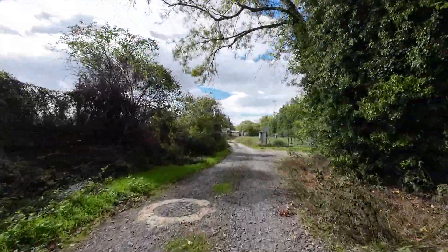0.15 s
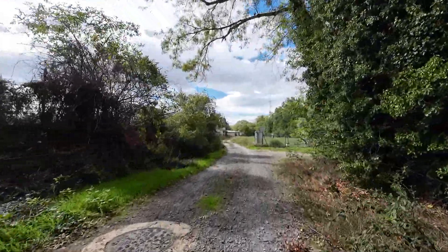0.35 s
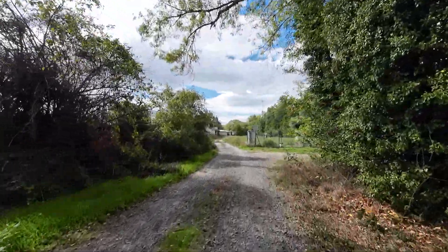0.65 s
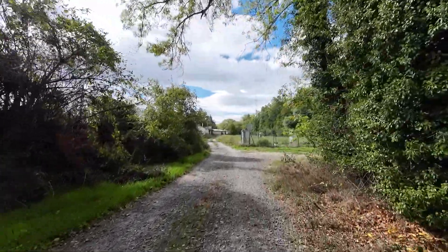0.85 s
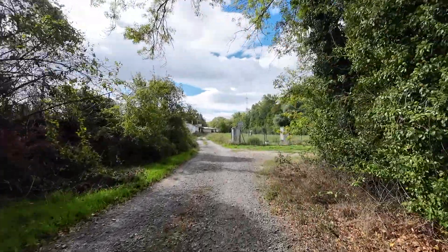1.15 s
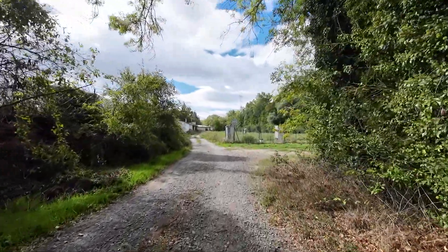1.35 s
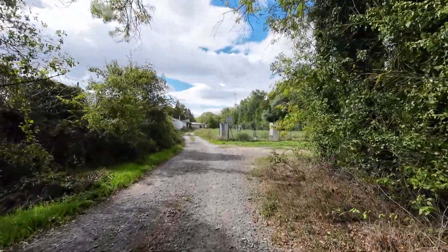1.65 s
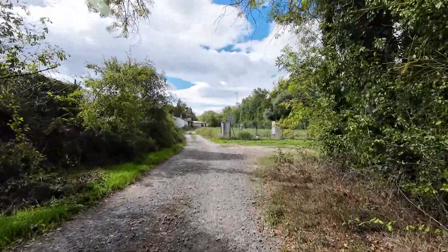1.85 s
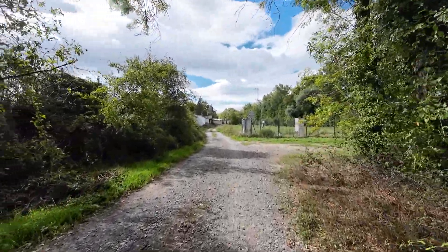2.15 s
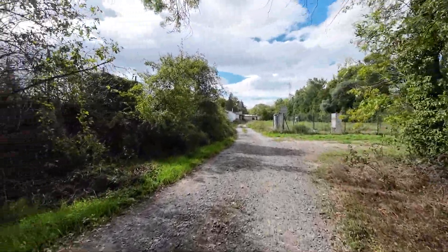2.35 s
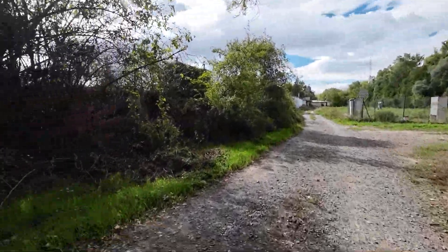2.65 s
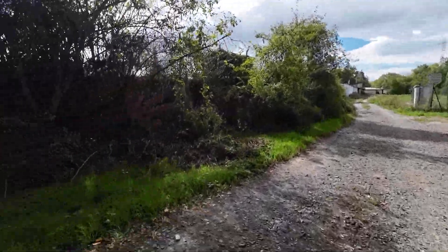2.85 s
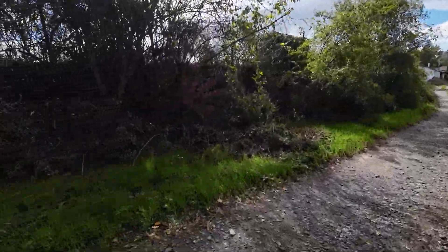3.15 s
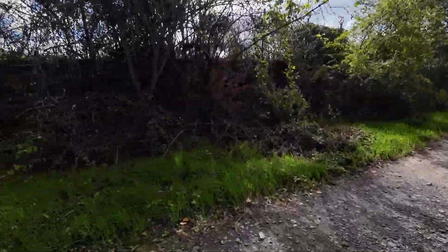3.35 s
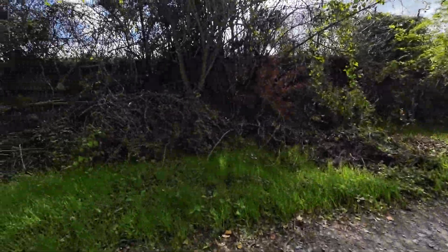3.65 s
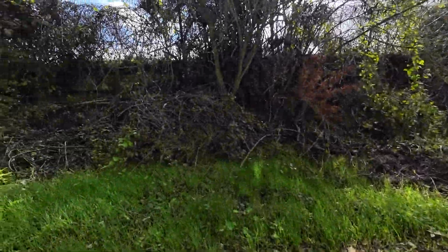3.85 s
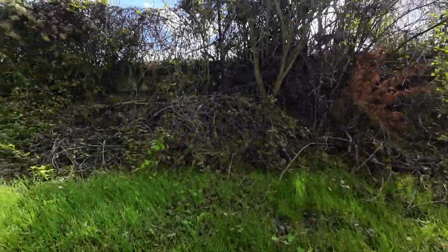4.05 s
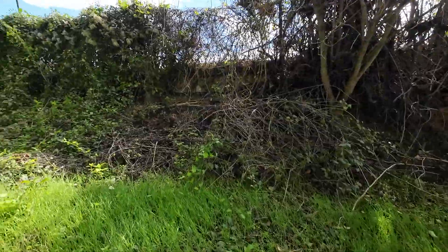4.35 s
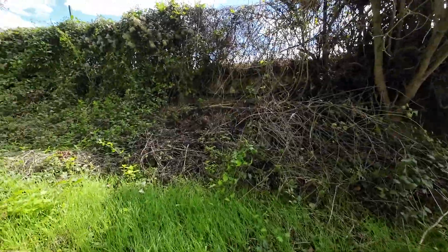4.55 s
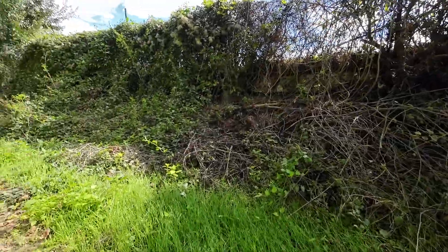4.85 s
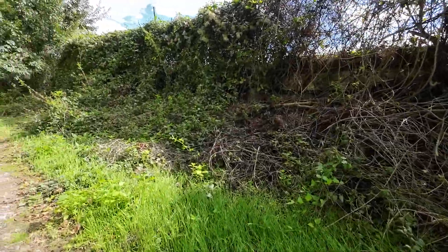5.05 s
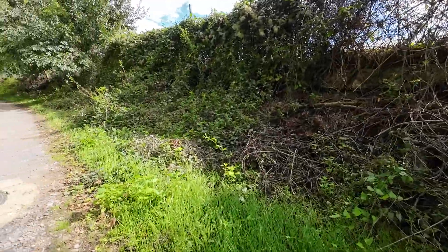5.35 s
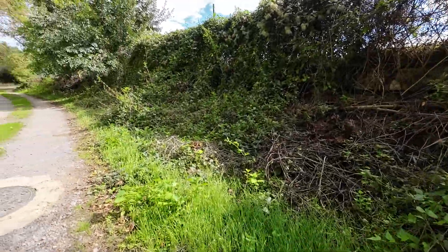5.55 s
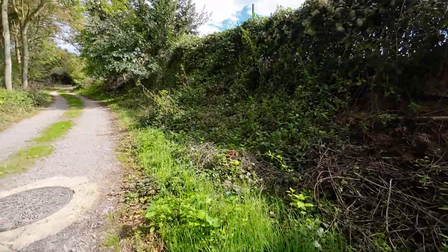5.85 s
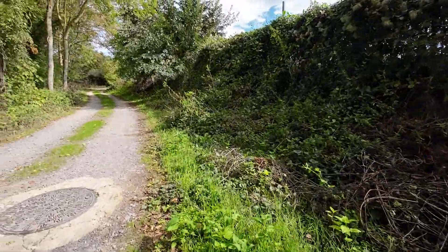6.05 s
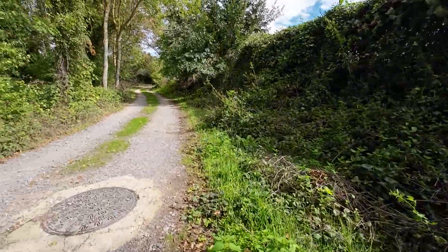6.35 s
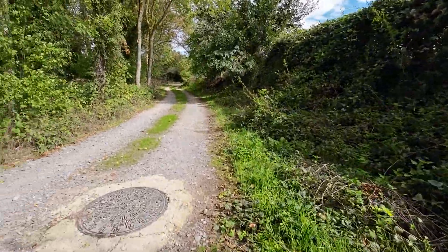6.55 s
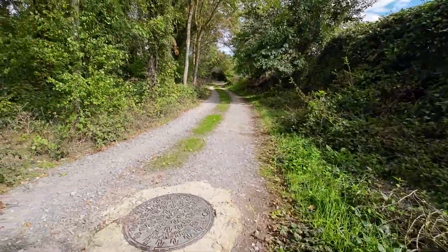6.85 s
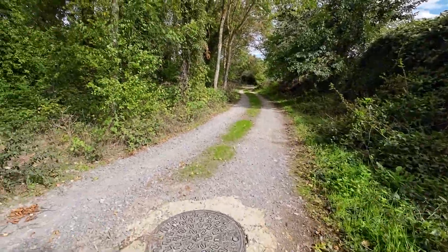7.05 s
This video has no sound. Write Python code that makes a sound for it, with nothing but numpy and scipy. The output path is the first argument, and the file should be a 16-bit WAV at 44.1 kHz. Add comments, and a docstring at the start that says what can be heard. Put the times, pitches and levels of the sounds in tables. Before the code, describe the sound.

Bicycle tyres crunch and pop over gravel under buffeting wind, then slow, stop with a thud, ratchet clicks and a few last shifting stones.

```python
"""Stones crunch and pop under the tyres of a bicycle that slows, turns and stops on a gravel track.
The gravel is many short wavelets over shaped noise; single stones have their own pops, thumps and rolls.
Shaped noise also makes the wind that rumbles in and slaps a microphone on the rider, and the rustling.
Quick bursts make the ticks, the ratchet and the thuds that ring the frame; a spoke pings and the
frame hums in sine tones, with a thin high whistle and far wind behind."""
import sys
import numpy as np
from scipy import signal
from scipy.fft import rfft, irfft, next_fast_len
from scipy.io import wavfile
from scipy.ndimage import map_coordinates

SR = 44100
rng = np.random.default_rng(int(sys.argv[2]) if len(sys.argv) > 2 else 0)


def linear_from_db(decibels):
    """Turn decibels (scalar or array-like) into linear amplitude factors; 0 gives 1."""
    return 10 ** (np.asarray(decibels, float) / 20)


def output_pcm(signal):
    """Save a mono or channel-first signal as 16-bit PCM at the path in sys.argv[1].

    Samples are clipped to [-1, 1] before scaling.
    """
    pcm = np.clip(np.atleast_2d(signal).T, -1, 1) * 32767
    wavfile.write(sys.argv[1], SR, np.round(pcm).astype(np.int16))


N = 317961  # length in samples

# Eddies in the wind that slap the microphone. Each row: time in seconds, level of the click in dB.
SLAP_TIMES = [(0.0313, -17.5), (0.07, -26), (0.0992, -25), (0.1587, -32), (0.234, -24), (0.2527, -25),
              (0.381, -26.5), (0.446, -30), (0.5141, -32), (0.532, -27), (0.5456, -18.5), (0.6125, -25.5),
              (0.667, -27), (0.7573, -25.5), (0.8708, -26), (0.95, -30), (1.149, -30), (1.1923, -39),
              (1.2266, -26), (1.3424, -24), (1.4, -34), (1.632, -35), (1.7603, -40), (1.8032, -36),
              (1.8898, -34)]
# Colour of bright rustling and of small clicks. Each row: frequency in Hz, level in dB per Hz.
RUSTLE_SPECTRUM = [(1500, -5), (2600, 0), (3800, -2), (4500, -4), (5700, 2), (6700, -5), (7600, -2),
                   (8900, -9), (10000, -4), (11500, -5), (13600, -17), (15200, -6.5), (16000, -27)]
# Colour of the hiss of gravel. Each row: frequency in Hz, level in dB per Hz.
GRAVEL_SPECTRUM = [(210, 1), (350, -3.5), (584, 1), (1020, 2.5), (1410, 2), (3730, -18), (5570, -24),
                   (9140, -36), (11300, -62), (16000, -51)]


def unit(x):
    """Scales x to an average strength (rms) of 1."""
    return x / np.sqrt(np.mean(x ** 2) + 1e-20)


def along(points, hz):
    """Reads a curve of (Hz, value) points at the frequencies hz, on a log axis as we hear pitch."""
    f, v = np.transpose(points)
    return np.interp(np.log(hz + 1), np.log(f + 1), v)


def curves(rows):
    """Joins the rows by straight lines: one value per sample for each column after the time."""
    s, *columns = np.transpose(rows)
    return [np.interp(np.arange(N) / SR, s, column) for column in columns]


def wobble(rate):
    """A smooth random curve around zero, with this many random points a second."""
    points = rng.standard_normal(int(N * rate / SR) + 4)
    return map_coordinates(points, [np.arange(N) * rate / SR])


def filtered(x, response):
    """Multiplies each frequency in x by response(hz)."""
    m = next_fast_len(N + 8192)  # spare room, so that the end does not wrap into the start
    return irfft(rfft(x, m) * response(np.fft.rfftfreq(m, 1 / SR)), m)[..., :N]


def coloured(x, spectrum):
    """Filters x by the spectrum and scales it to rms 1."""
    return unit(filtered(x, lambda hz: linear_from_db(along(spectrum, hz))))


def pops(s, db, hz, cycles):
    """Short wavelets: each swells for the given number of cycles, then dies away."""
    t = np.arange(512) / SR
    u = t * (hz / cycles)[:, None]  # 1 at the height of the swell
    swell = u ** 2 * np.exp(2 - 2 * u)
    phase = rng.uniform(0, 2 * np.pi, (len(s), 1))
    wave = linear_from_db(db)[:, None] * swell * np.sin(2 * np.pi * hz[:, None] * t + phase)
    at = np.round(s * SR).astype(int)[:, None] + np.arange(len(t))
    return np.bincount(at.ravel(), wave.ravel(), N + SR)[:N]  # adds up where pops overlap


def bursts(s, db, t60, attack=0.00032):
    """Envelope of quick bursts; t60 is the time in seconds in which each fades by 60 dB."""
    env = np.zeros(N + SR)
    t = np.arange(SR // 4) / SR
    for start, level, decay in zip(s, db, np.broadcast_to(t60, np.shape(s))):
        fade = linear_from_db(level - 60 * t / max(decay, 1e-3))
        rise = 1 - np.exp(-(t / attack) ** 2)
        env[round(start * SR):][:len(t)] += fade * rise
    return env[:N]


def swells(rows):
    """Envelope of bell-shaped swells, one for each (seconds at the height, dB, length in seconds)."""
    t = np.arange(0, N / SR, .001)  # drawn every millisecond
    bells = sum(linear_from_db(db) * np.exp(-(2 * (t - s) / length) ** 2) for s, db, length in rows)
    return np.interp(np.arange(N) / SR, t, bells)


def scatter(count, spread_db, rarest):
    """Random times and levels in dB, a few well above the rest; the share rarest bounds the biggest."""
    draw = rng.uniform(size=(count, 2))
    return draw[:, 0] * N / SR, -spread_db * np.log(draw[:, 1] + rarest)


def clicks(s, db, bright_db, t60, snap_db):
    """A sharp first contact, strongest in dull clicks, then a short decay whose treble dies sooner."""
    metal = coloured(rng.standard_normal(N), RUSTLE_SPECTRUM)
    top = filtered(metal, lambda hz: hz > 9000)
    snap = pops(s, db + snap_db - .5 * bright_db, np.full(len(s), 3600.), cycles=1.0)
    body = bursts(s, db - 3, t60) * unit(metal - top)
    treble = bursts(s, db + bright_db + 0.5, 0.73 * t60) * unit(top)
    return snap + body + treble


def air():
    """Far wind in the hedges, never silent: soft noise with a slowly drifting level."""
    # Colour of the far wind. Each row: frequency in Hz, level in dB per Hz.
    air_spectrum = [(120, -68), (200, -9), (330, -6.5), (457, -3.5), (4000, -29.5), (8800, -120)]
    return linear_from_db(-53.5 + 0.28 * wobble(2.4)) * coloured(rng.standard_normal(N), air_spectrum)


def whistle():
    """A thin, very high steady tone that comes and goes in a few faint swells."""
    # Swells of the tone. Each row: time of the height in seconds, level in dB, length in seconds.
    whistle_swells = [(3.79, -64, .17), (3.99, -69, .12), (4.19, -62, .18), (4.45, -62, .25)]
    tone = np.sin(2 * np.pi * 15740 * np.arange(N) / SR)
    return swells(whistle_swells) * linear_from_db(2.1 * wobble(40)) * tone


def hum():
    """The frame hums faintly as the wheel drags round: a wavering tone with its octave."""
    # Swells of the hum. Each row: time of the height in seconds, level in dB, length in seconds.
    hum_swells = [(3.04, -55, .2), (3.26, -58, 0.18)]
    hum_hz, octave_db = 380, -1.5
    phase = 2 * np.pi * np.cumsum(hum_hz * (1 + 0.025 * wobble(40))) / SR
    tone = np.sin(phase) + linear_from_db(octave_db) * np.sin(2 * phase)
    return swells(hum_swells) * linear_from_db(4.2 * wobble(25.04)) * tone


def pings():
    """A thrown stone strikes a spoke, and each strike rings it briefly at its own few pitches."""
    # Strikes on the spoke. Each row: time in seconds, level in dB.
    strikes = [(6.2705, -38), (6.279, -43)]
    # What the spoke rings with. Each row: frequency in Hz, level in dB, time to fade by 60 dB in seconds.
    spoke_modes = [(4320, -7, .04), (5550, -4, .025), (7450, -9, .025)]
    s, db = np.transpose(strikes)
    t = np.arange(N) / SR
    ring = 0
    for hz, mode_db, t60 in spoke_modes:
        env = bursts(s, db + mode_db, t60) * linear_from_db(2.2 * wobble(300))
        ring = ring + env * np.sin(2 * np.pi * hz * t)
    return ring


def ratchet():
    """The freewheel turns as the bicycle is pushed round: a soft click as the pawl drops over a tooth."""
    # Speed of the ratchet. Each row: time in seconds, clicks a second.
    ratchet_speed = [(4.597, 20), (4.65, 26), (4.74, 32), (4.87, 29), (4.95, 25), (5.0, 21)]
    t = np.arange(N) / SR
    turning = (t >= ratchet_speed[0][0]) * (t <= ratchet_speed[-1][0])
    teeth = np.cumsum(curves(ratchet_speed)[0] * turning) / SR  # teeth passed so far
    s = t[1:][np.diff(np.ceil(teeth)) > 0]
    env = bursts(s, rng.normal(-48.5, 1.6, len(s)), 0.032, attack=0.0024)
    return env * coloured(rng.standard_normal(N), RUSTLE_SPECTRUM)


def rustle():
    """Bright fizz of grit and cloth near the microphone, dotted with ticks of chain and frame."""
    # Steady rustling near the microphone. Each row: time in seconds, level in dB.
    cloth_level = [(0, -56.5), (1.4, -57), (2.1, -63.5), (3.35, -65.5), (4.3, -62), (5.4, -63), (5.8, -55),
                   (6.2, -55.5), (6.4, -61.5), (6.75, -52.5), (7.21, -59)]
    # Cloth or leaves brush past. Each row: time of the height in seconds, level in dB, length in seconds.
    brush_swells = [(2.905, -50, 0.022), (3.062, -49, 0.011), (3.53, -53, 0.023), (5.69, -52, 0.14),
                    (6.0, -55, 0.031), (7.17, -53.5, 0.071)]
    # Ticks of the chain and grit on the frame. Each row: time in seconds, level in dB, brightness in dB.
    tick_times = [(2.2968, -34, -27), (2.9327, -37.5, -26), (3.056, -28.5, -9), (3.077, -44, -2),
                  (3.108, -38.5, -5), (3.2214, -41.5, 3), (3.501, -30, -12), (3.522, -32.5, 1),
                  (3.601, -34, -19), (3.8067, -39, -11), (4.2751, -30, -12), (5.6544, -35.5, 3),
                  (5.684, -29.5, -6), (5.733, -33.5, -5), (5.9075, -32, -14), (5.9744, -41, 4),
                  (6.27, -30, -19), (6.366, -43, 0), (6.394, -40, 1), (6.5198, -34.5, -18),
                  (6.7372, -34, -9), (6.9381, -43, 9), (7.187, -34, -23)]
    s, size_db = scatter(count=400, spread_db=1.5, rarest=.01)
    grit = unit(bursts(s, size_db, 0.012) * linear_from_db(0.45 * wobble(6.6)))
    noise = coloured(rng.standard_normal(N), RUSTLE_SPECTRUM)
    fizz = (0.72 * linear_from_db(1.4 * wobble(21)) + 0.41 * grit) * noise
    ticks = clicks(*np.transpose(tick_times), t60=.013, snap_db=-20)
    return (linear_from_db(curves(cloth_level)[0]) + swells(brush_swells)) * fizz + ticks


def thuds():
    """A foot or wheel lands: a dull blow that also rings the frame, roughly, as its joints chatter."""
    # Landings. Each row: time in seconds, level in dB, time for the blow to fade by 60 dB in seconds.
    landings = [(5.116, -14.5, 0.032), (5.129, -28.5, 0.08), (6.2686, -24, 0.04), (6.527, -27.5, 0.04),
                (6.827, -29.5, 0.051), (7.056, -22, 0.017)]
    # Colour of the blow on the ground. Each row: frequency in Hz, level in dB per Hz.
    thud_spectrum = [(50, -26), (278, -8), (337, -11), (495, -7), (935, -19), (2800, -30.5), (5000, -47),
                     (6500, -44), (11000, -120)]
    # What the frame rings with. Each row: frequency in Hz, level in dB, time to fade by 60 dB in seconds.
    frame_modes = [(69.2, 2.5, 0.12), (499, -7, 0.054), (708, -19, 0.18), (915, -22, 0.39),
                   (1710, -17.5, 0.063), (2650, -22, 0.063)]
    s, db, t60 = np.transpose(landings)
    blow = bursts(s, db, t60, attack=0.0033) * coloured(rng.standard_normal(N), thud_spectrum)
    t = np.arange(N) / SR
    ring = 0
    for hz, mode_db, decay in frame_modes:
        waver = np.cumsum(0.044 * hz * wobble(80)) / SR  # the pitch shakes
        env = bursts(s, db + mode_db - 4.0, decay, attack=1 / hz)  # takes about a cycle to swing up
        ring = ring + env * linear_from_db(2.6 * wobble(90)) * np.sin(2 * np.pi * (hz * t + waver))
    return blow + ring


def rumble():
    """Wind shakes the microphone in uneven lumps, now deep, now fluttering; each eddy pushes it."""
    # Wind on the microphone. Each row: time in seconds, level in dB, deepest part against it in dB.
    wind_level = [(0, -22.5, -8), (.2, -21, 3), (.33, -24.5, -2), (.39, -23, -6), (.58, -27.5, 3.5),
                  (.75, -32.5, -1), (.93, -24, 1.5), (1.08, -32, 5), (1.3, -24, 2), (1.45, -33, -4),
                  (1.82, -32, 4.5), (1.95, -34, -3), (2.4, -41, 5.5), (3.05, -40, -4), (3.35, -44.5, -0.5),
                  (3.65, -38, -4.5), (4.2, -42.5, -3.5), (4.52, -34, -14), (4.62, -43, -5.5),
                  (5.02, -47, -14), (5.13, -34.5, -9), (5.23, -51.5, -1), (6.6, -46, -6),
                  (6.75, -47.5, -13), (6.99, -37.5, 1), (7.21, -40.5, 4.5)]
    # Colour of the rumble. Each row: frequency in Hz, level in dB per Hz.
    rumble_spectrum = [(12, -41), (22, 8), (50, 0), (68, 1), (130, -8), (190, -12), (270, -12),
                       (450, -23.5), (800, -36), (1300, -120)]
    flutter_base_db, flutter_grows = -11.5, 1.21  # against the wind; dB of flutter for each dB of wind
    push_db, push_s = 12, .0025  # the push over the wind; the time it takes to rise or fall
    level_db, deep_db = curves(wind_level)
    noise = coloured(rng.standard_normal(N), rumble_spectrum)
    deep = filtered(noise, lambda hz: hz < 55)
    flutter = filtered(noise, lambda hz: hz > 190)
    body = noise - deep - flutter
    lumps = linear_from_db(1.5 * wobble(9) + 2.7 * wobble(25))
    flutter_db = flutter_base_db + (flutter_grows - 1) * (level_db - level_db.mean())
    t = np.arange(N) / SR
    push = sum(np.exp(-np.abs(t - s - .001) / push_s) for s, db in SLAP_TIMES)
    push = filtered(push, lambda hz: hz ** 2 / (hz ** 2 + 30 ** 2))  # the air springs back
    wind = unit(lumps * body) + linear_from_db(deep_db) * unit(deep) + linear_from_db(flutter_db) * unit(lumps * flutter)
    return linear_from_db(level_db + 0.5) * (wind + linear_from_db(push_db) * push)


def slaps():
    """The dull click on the crest of each eddy that pushes the microphone."""
    return clicks(*np.transpose(SLAP_TIMES), bright_db=-13, t60=0.0043, snap_db=-16.0)


def small_stones():
    """Tyres roll over small stones that crunch in clumps over a gritty hiss, and loose stones grind."""
    # Tyres rolling on the track. Each row: time in seconds, level in dB.
    roll_level = [(0, -29), (.8, -33.5), (1.45, -33.5), (1.6, -36.5), (2.1, -42), (2.5, -37), (2.75, -40),
                  (2.9, -45), (3.2, -56), (3.65, -43), (4.05, -45.5), (4.42, -37), (4.58, -50.5),
                  (5.5, -59.5), (5.95, -49.5), (6.6, -52.5), (7.21, -48.5)]
    # A tyre, later a shoe, grinds through loose stones. Each row: time of the height in seconds,
    # level in dB, length in seconds, share of coarse stones from 0 to 1.
    scrunches = [(0.583, -38, 0.016, 0), (0.726, -31, 0.037, 0.42), (0.843, -38.5, 0.042, 0),
                 (2.657, -32.5, 0.028, 0.4), (3.989, -32, 0.011, 0.13), (4.125, -36.5, 0.04, 0.15),
                 (4.291, -36, 0.032, 0.53), (4.449, -32.5, 0.042, 0), (4.522, -41, 0.14, 0.3),
                 (6.317, -42.5, 0.039, 0.04), (6.854, -35, 0.011, 0.9), (6.891, -33, 0.013, 0.9),
                 (6.972, -34.5, 0.14, 0.68), (7.004, -27.5, 0.032, 0.44), (7.06, -36, 0.045, 0.5)]
    s, size_db = scatter(count=4000, spread_db=5.0, rarest=0.027)
    hz = np.maximum(1400 * np.exp(0.35 * rng.standard_normal(len(s))), 850)
    crunch = unit(pops(s, size_db, hz, cycles=1.05) * linear_from_db(3.5 * wobble(30)))
    grit = 0.62 + 0.78 * unit(bursts(s, size_db, 0.013, attack=0.0015))  # each small stone also scrapes
    hiss = unit(grit * coloured(rng.standard_normal(N), GRAVEL_SPECTRUM))

    # splinters flick off with a crisp tick, all of one size
    s, size_db = scatter(count=500, spread_db=0, rarest=0.028)
    chips = unit(pops(s, size_db, np.full(len(s), 2700.), cycles=0.4))

    s, size_db = scatter(count=2500, spread_db=3.0, rarest=.03)
    hz = 500 * np.exp(0.15 * rng.standard_normal(len(s)))
    coarse = unit(pops(s, size_db, hz, cycles=1.67))
    s, size_db = scatter(count=6000, spread_db=2.0, rarest=0.034)
    hz = 1150 * np.exp(0.19 * rng.standard_normal(len(s)))
    packed = unit(pops(s, size_db, hz, cycles=0.81))
    fine = 0.82 * packed + 0.74 * hiss
    grind = sum(swells([row]) * ((1 - share) * fine + share * coarse) for *row, share in scrunches)

    rolling = 0.48 * crunch + 0.53 * hiss + 0.029 * chips
    return linear_from_db(curves(roll_level)[0]) * rolling + grind


def single_stones():
    """Single stones and bright snaps, squeezed out by a tyre, later a shoe: a crack, thump and roll."""
    # Single stones and bright snaps. Each row: time in seconds, level in dB, pitch in Hz.
    stones = [(0.077, -19.5, 1090), (0.278, -13.5, 1490), (0.281, -15, 910), (0.35, -19, 1000),
              (0.421, -19.5, 1540), (0.521, -19, 1380), (0.568, -13.5, 1200), (0.634, -16.5, 1250),
              (0.846, -16, 1250), (0.985, -20.5, 1340), (1.046, -20.5, 1600), (1.066, -15, 1390),
              (1.079, -9.5, 1170), (1.164, -17.5, 1310), (1.258, -18, 1220), (1.282, -7, 1520),
              (1.333, -14, 1270), (1.426, -16, 1270), (1.468, -9, 1042), (1.545, -22, 1180),
              (1.579, -8, 1380), (1.987, -26, 1450), (2.2, -16.5, 1280), (2.3, -16.5, 1220),
              (2.412, -19, 1210), (2.451, -12, 1110), (2.478, -29, 2400), (2.488, -20.5, 1050),
              (2.4886, -24, 2700), (2.535, -22, 1200), (2.614, -24, 1300), (2.64, -23, 1160),
              (2.671, -28.5, 1910), (2.715, -16, 1270), (3.207, -31, 1290), (3.393, -29, 1280),
              (3.497, -20.5, 1100), (3.605, -16.5, 1200), (3.751, -26, 960), (3.872, -26, 1170),
              (3.985, -27.5, 1270), (4.057, -14, 1200), (4.105, -13, 1105), (4.283, -16, 1200),
              (4.35, -16.5, 1200), (4.368, -29, 900), (4.402, -23, 1340), (4.407, -17.5, 1280),
              (4.439, -10, 1240), (4.462, -18, 1330), (4.491, -22, 1400), (4.507, -30, 3200),
              (4.514, -21, 1110), (4.524, -25, 1200), (4.563, -21.5, 1290), (5.123, -29, 2930),
              (5.134, -29, 2370), (5.707, -36.5, 900), (5.998, -30.5, 1050), (6.003, -32.5, 1740),
              (6.206, -24, 1240), (6.216, -35, 1400), (6.27, -13.5, 1500), (6.315, -38, 1500),
              (6.428, -33.5, 1160), (6.604, -18.5, 1024), (6.855, -18, 1130), (6.86, -22.5, 1150),
              (6.881, -27, 800), (6.899, -15.5, 1070), (6.905, -22, 1060), (6.908, -12, 1044),
              (6.959, -22, 1010), (6.993, -21, 1200), (7.007, -20, 1110), (7.021, -25, 1200),
              (7.043, -32, 3150), (7.048, -30.5, 2750), (7.056, -18.5, 920)]
    usual_hz, thump_base_db, thump_db_per_octave = 1200, -20.5, 63
    s, db, hz = np.transpose(stones)
    crack = pops(s, db - 0.5, hz, cycles=1.04 * np.sqrt(hz / usual_hz))
    # lower, bigger stones thump more
    thump_db = np.minimum(thump_base_db - thump_db_per_octave * np.log2(hz / usual_hz), 0)
    thump = pops(s, db + thump_db, np.full(len(s), 420.), cycles=0.37)
    bite = pops(s, db - 15, 2 * hz, cycles=0.65)  # the sharp edge of the crack
    # the stone rolls on, duller: the gravel colour is applied twice
    dull = coloured(coloured(rng.standard_normal(N), GRAVEL_SPECTRUM), GRAVEL_SPECTRUM)
    roll = bursts(s + 0.0023, db - 18.0, 0.058, attack=0.00017) * dull
    return crack + thump + bite + roll


def scene():
    """Adds up all sources; everything reaches both ports of the microphone alike."""
    background = air() + whistle() + hum() + rumble() + slaps()
    details = pings() + ratchet() + rustle() + thuds()
    sound = background + details + small_stones() + single_stones()
    return np.array([sound, sound])


def top_cut(x):
    """Nothing passes above the cut-off."""
    return signal.sosfilt(signal.butter(12, 17010, fs=SR, output="sos"), x)


def record(dry):
    """Two microphone ports: the left is louder in the bass and earlier in the treble; the top is cut."""
    # How far the ports differ. Each row: frequency in Hz, their difference against their sum in dB.
    port_difference = [(60, -24), (270, -29.5), (740, -55.5), (2000, -43), (5500, -32.5), (9000, -22),
                       (13000, -24)]
    top_hz = 15950

    def response(hz):
        turn = np.exp(1j * np.pi / 2 * np.clip(hz / 1500, 0, 1))  # from a level to a time difference
        lean = linear_from_db(along(port_difference, hz)) * turn
        return (hz < top_hz) * (1 + lean * [[1], [-1]])

    return top_cut(filtered(dry, response))


dry = scene()
out = record(dry)
output_pcm(out)
```